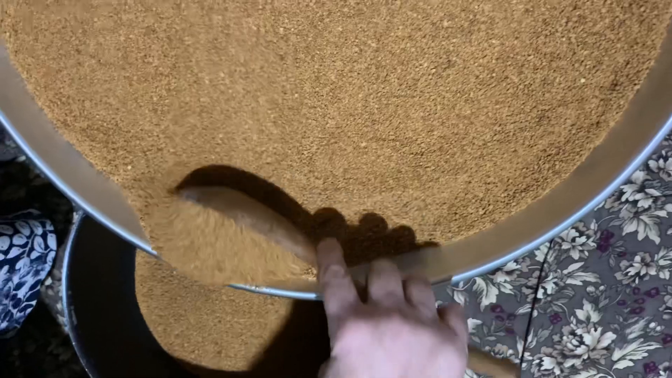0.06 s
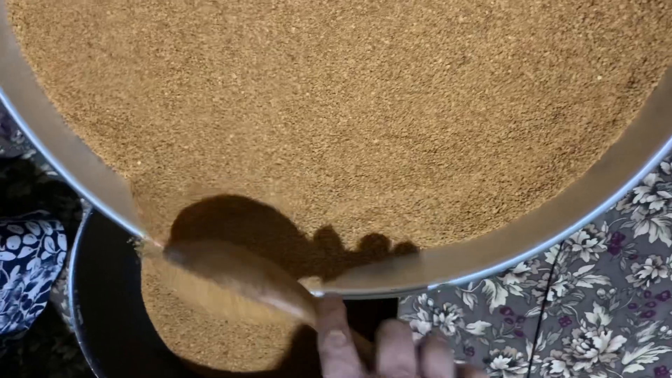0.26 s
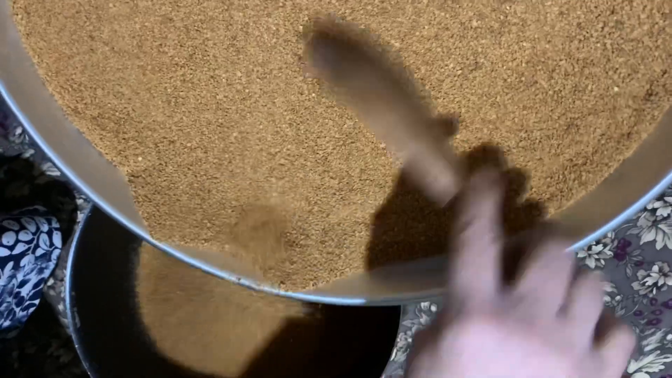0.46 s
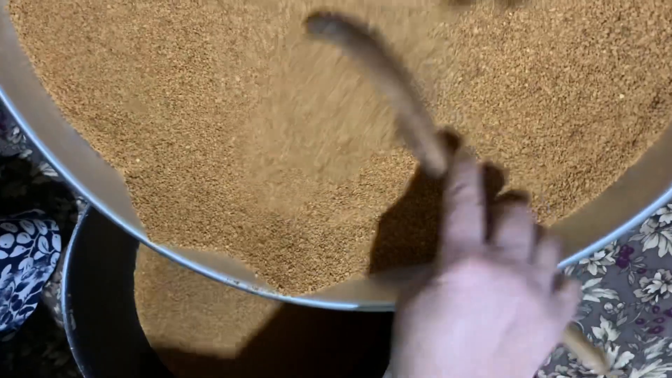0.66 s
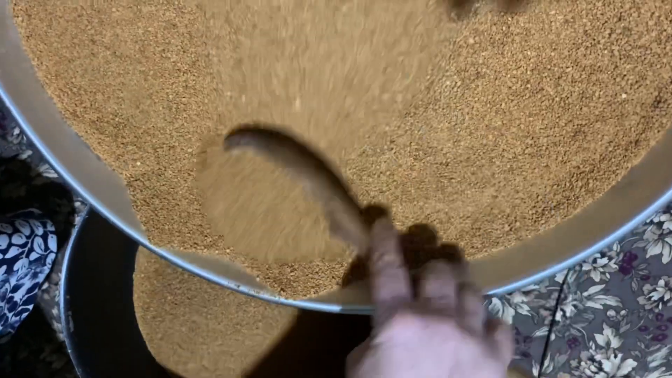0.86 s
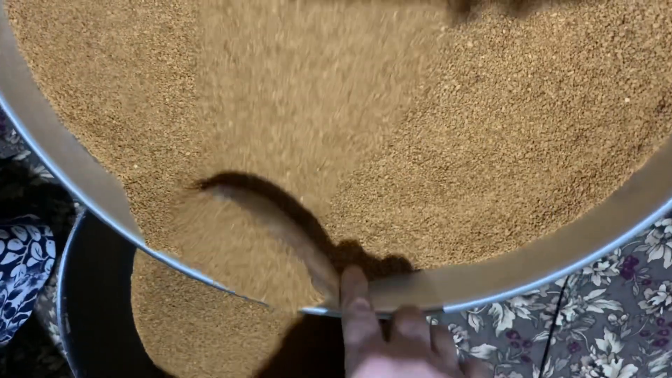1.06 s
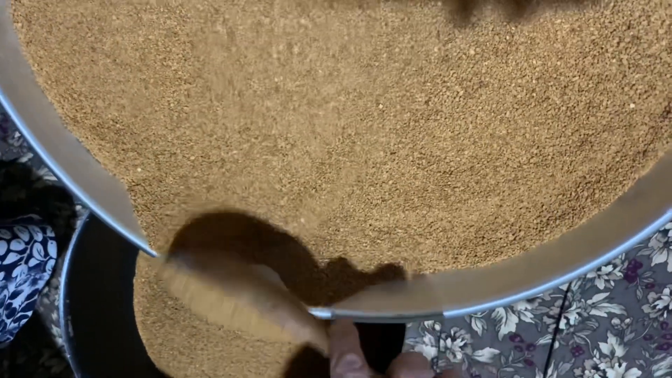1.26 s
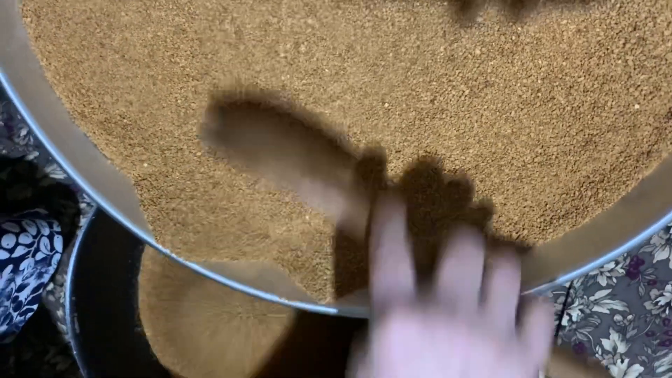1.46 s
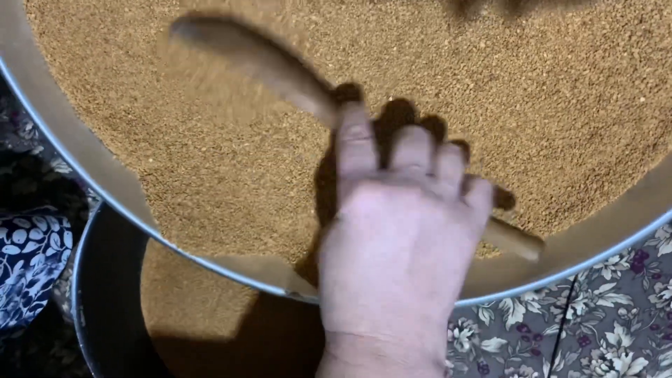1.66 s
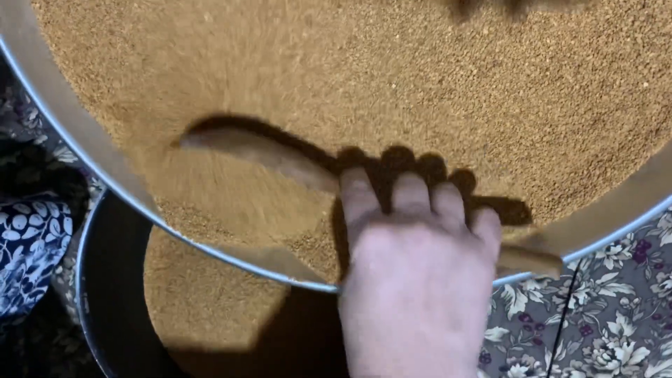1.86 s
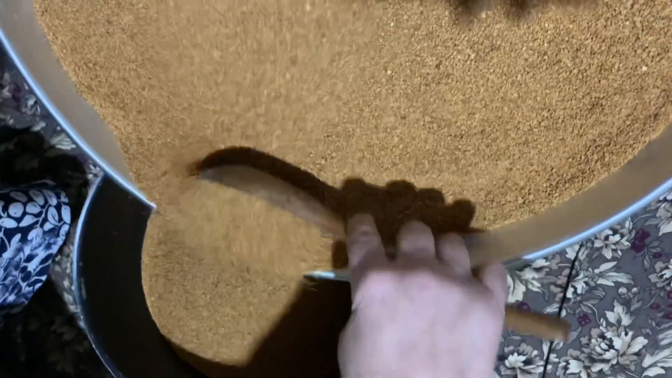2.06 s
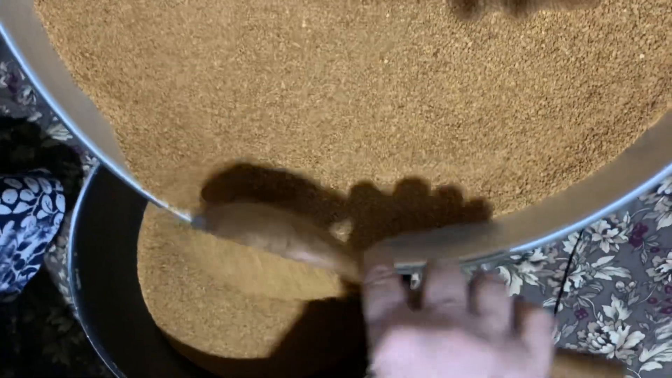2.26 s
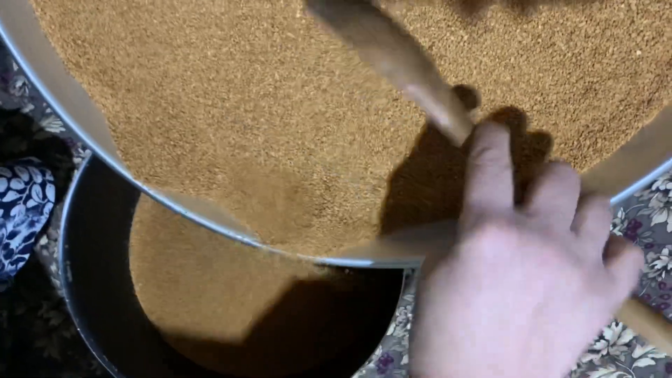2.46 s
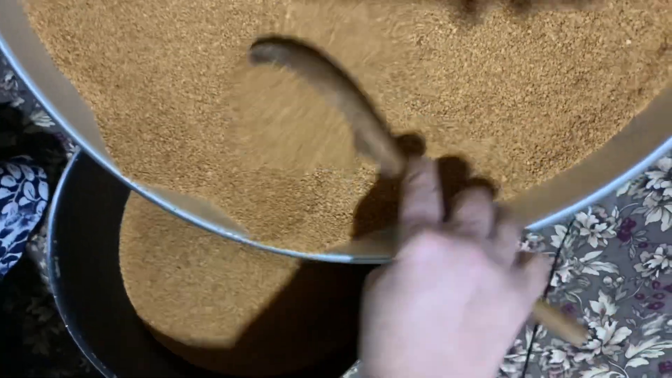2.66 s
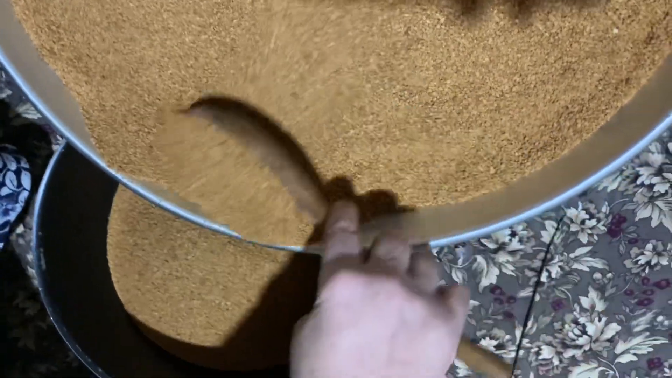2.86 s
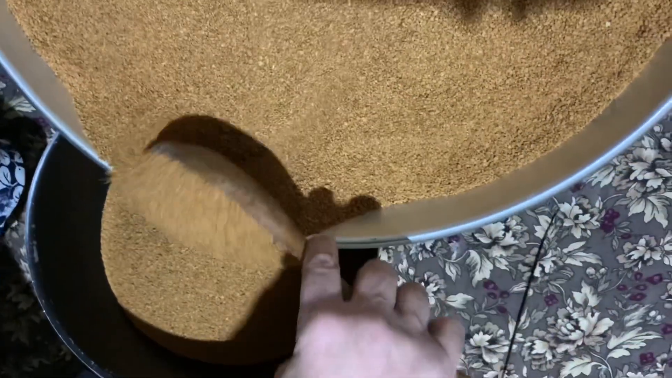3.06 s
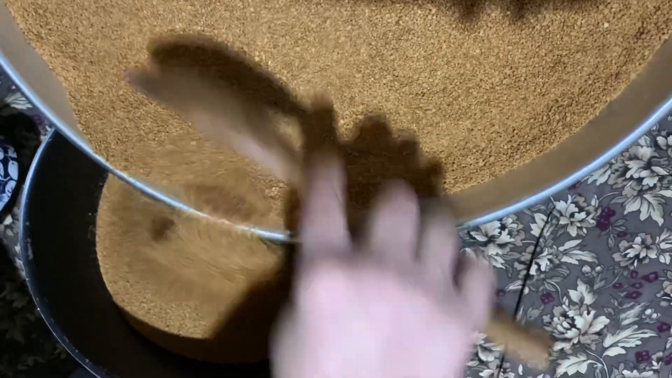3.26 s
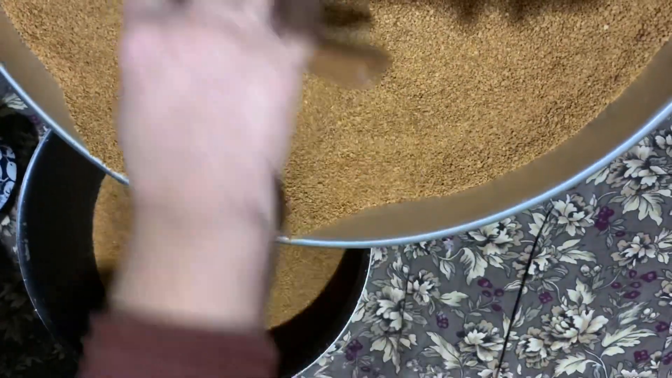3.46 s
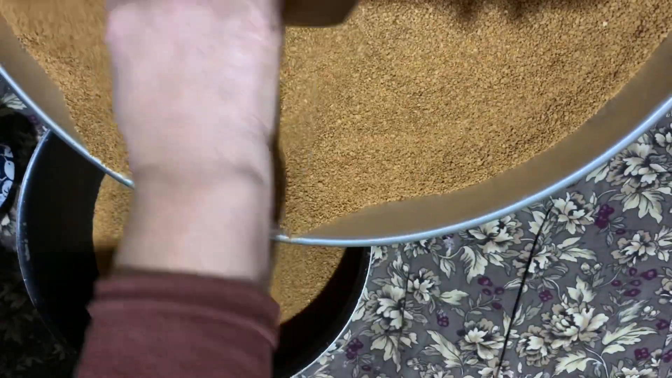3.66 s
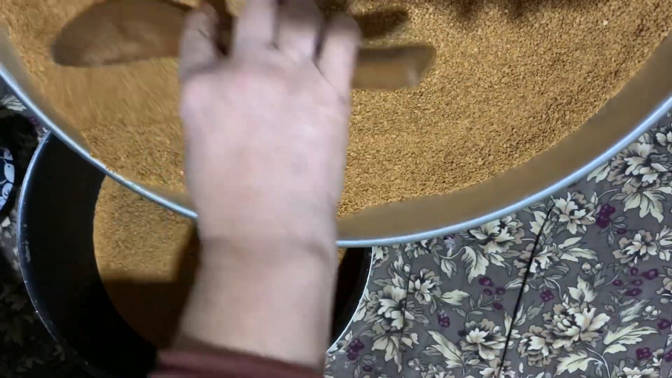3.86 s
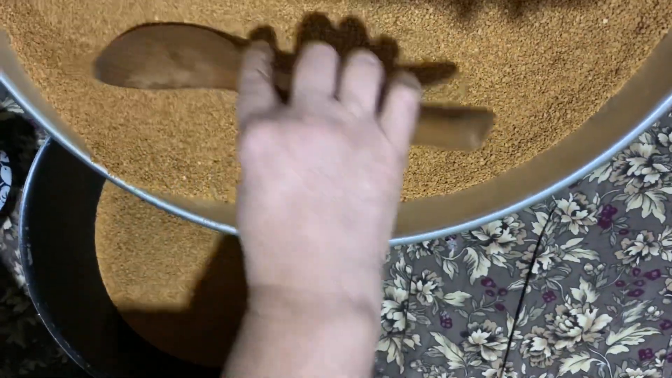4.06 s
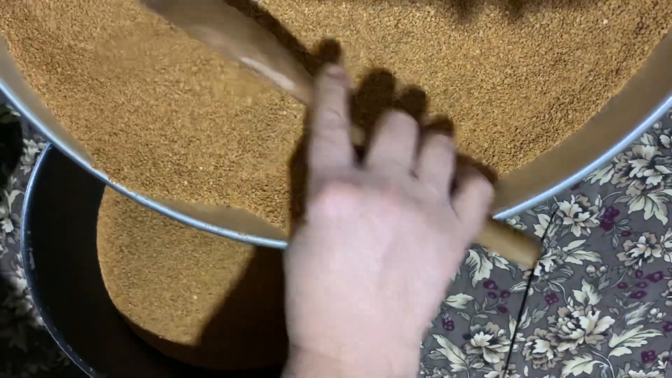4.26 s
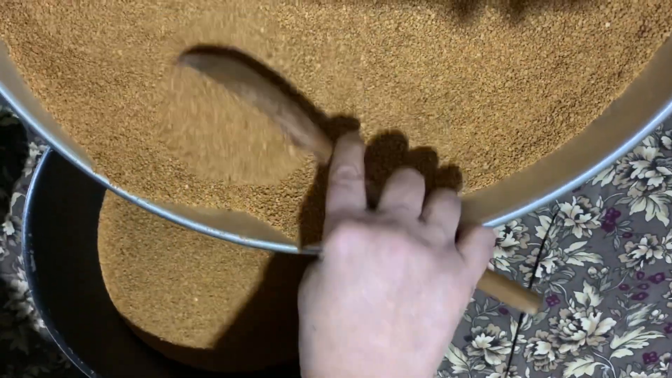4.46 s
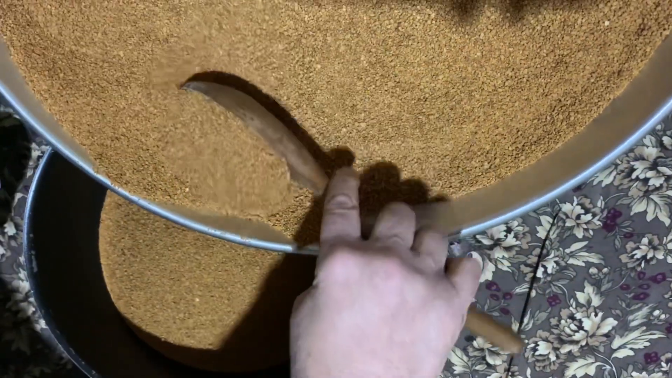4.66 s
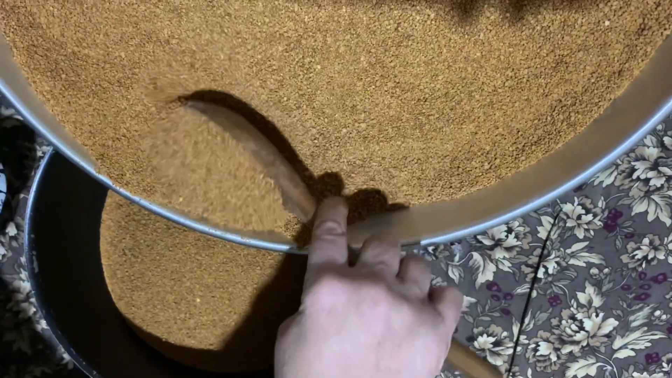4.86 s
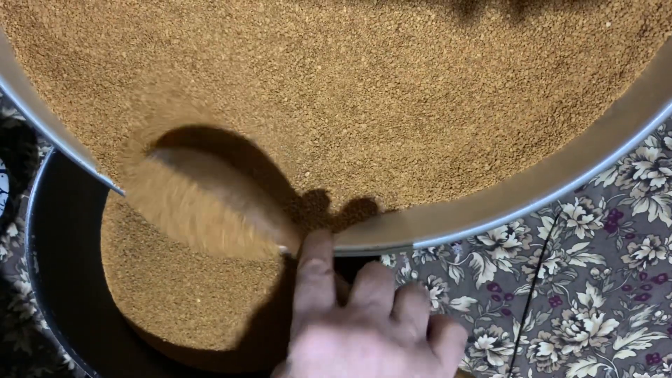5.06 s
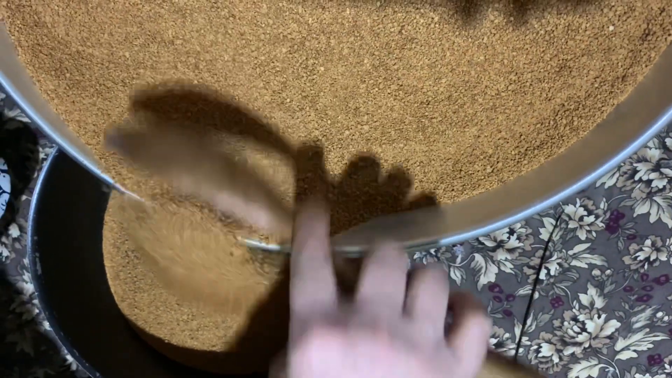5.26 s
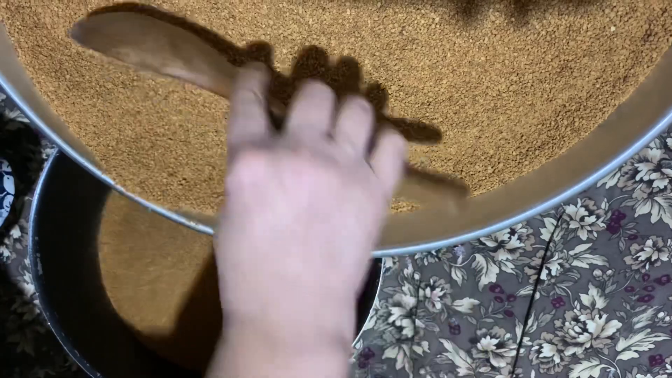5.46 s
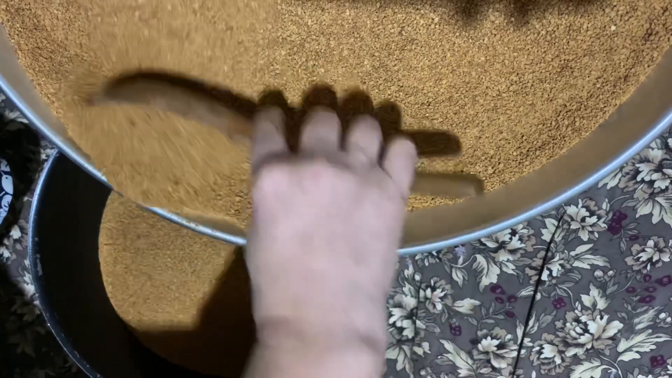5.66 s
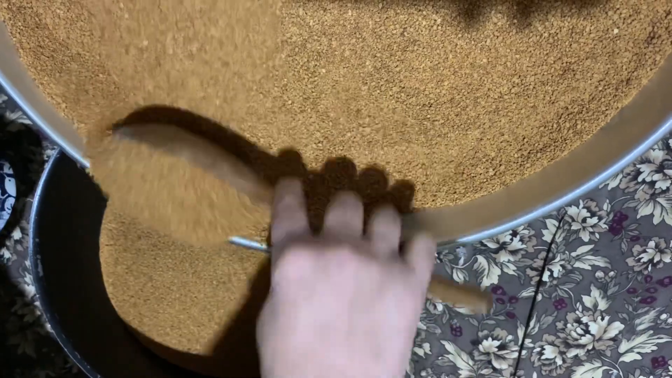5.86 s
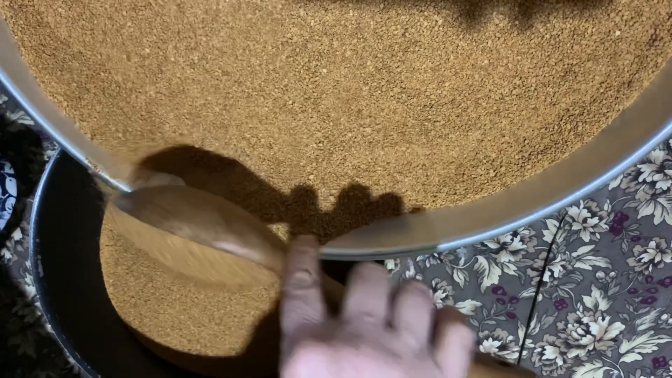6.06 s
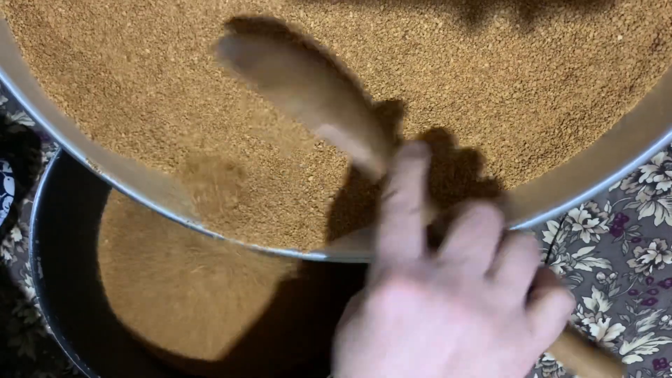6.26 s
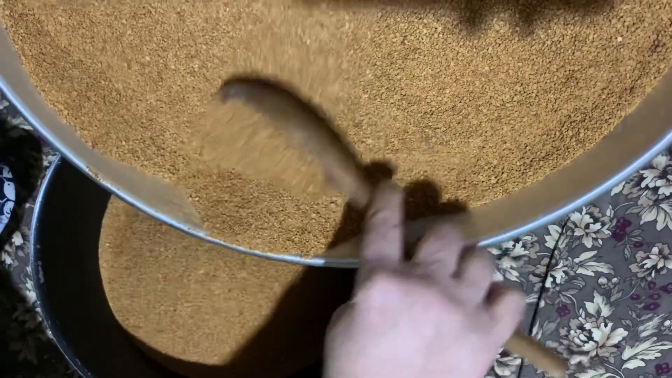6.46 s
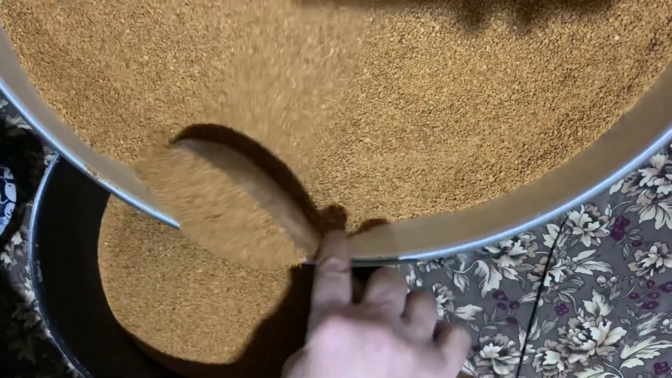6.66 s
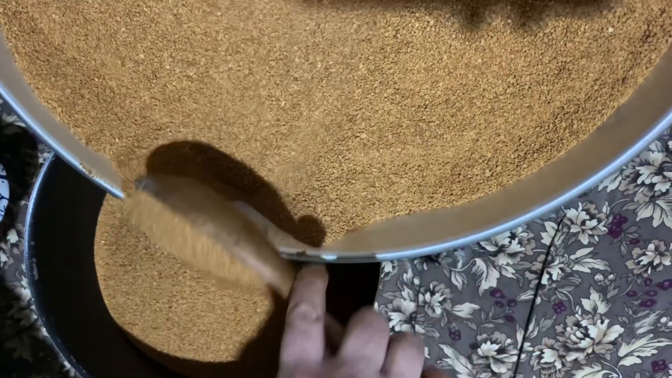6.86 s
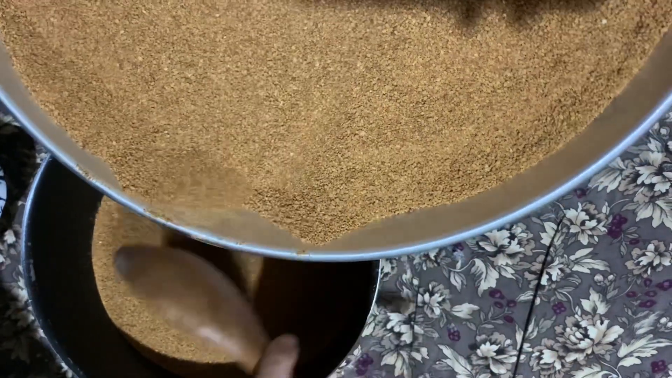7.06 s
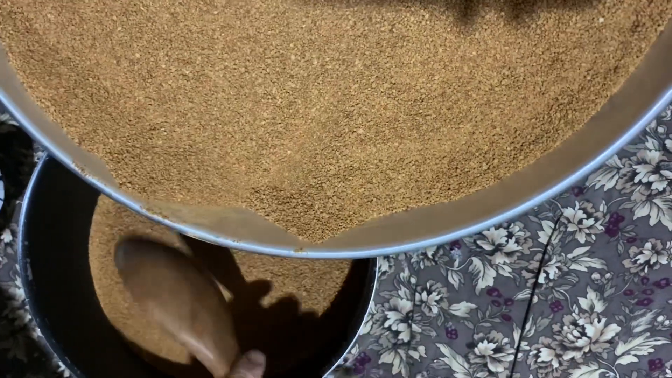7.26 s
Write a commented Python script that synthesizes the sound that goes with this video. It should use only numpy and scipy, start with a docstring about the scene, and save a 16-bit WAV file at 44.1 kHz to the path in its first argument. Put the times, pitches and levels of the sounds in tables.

```python
"""Scooping flour in a kitchen

Close to a stereo pair of microphones, a wooden spoon scoops coarse dry flour across a wide metal tray
and tips it into a pot. Each stroke is a hiss of sliding grains; the spoon crunches through the heap
and knocks the tray, which the flour damps. Farther off a motor, probably traffic outside, hums faintly
and speeds up."""
import sys
import numpy as np
from scipy import signal
from scipy.fft import rfft, irfft, next_fast_len
from scipy.io import wavfile
from scipy.ndimage import uniform_filter1d, map_coordinates

SR = 44100
rng = np.random.default_rng(int(sys.argv[2]) if len(sys.argv) > 2 else 0)


def log_audio(samples):
    """Write samples as a 16-bit WAV file to the path given in sys.argv[1]."""
    # one column per channel
    frames = np.atleast_2d(samples).T
    # limit to full scale, then quantise
    limited = np.clip(frames, -1, 1)
    pcm = np.round(limited * 32767).astype(np.int16)
    wavfile.write(sys.argv[1], SR, pcm)


N = 322812


def amp(db):
    """Decibels to gain."""
    return 10 ** (np.asarray(db) / 20)


def unit(x):
    """Scaled to rms 1."""
    return x / np.sqrt(np.mean(x ** 2) + 1e-20)


def along(points, hz):
    """Rows of (freq_hz, value) read on a log frequency axis."""
    freqs, values = np.transpose(points)
    return np.interp(np.log(hz + 1), np.log(freqs + 1), values)


def curves(rows):
    """One value per sample for each column after the time."""
    times, *columns = np.transpose(rows)
    return [np.interp(np.arange(N) / SR, times, column) for column in columns]


def wobble(rate):
    """A smooth random curve, rate knots a second."""
    return map_coordinates(rng.standard_normal(int(N * rate / SR) + 4), [np.arange(N) * rate / SR])


def hump(hz, centre_hz, octaves):
    """A broad resonance, 1 at its centre."""
    return np.exp(-.5 * (np.log2((hz + 1) / centre_hz) / octaves) ** 2)


def filtered(x, response):
    """x times a complex response of frequency."""
    n = x.shape[-1]
    padded = next_fast_len(n + SR // 10, True)
    return irfft(rfft(x, padded) * response(np.fft.rfftfreq(padded, 1 / SR)), padded)[..., :n]


def coloured(x, spectrum, size=2048):
    """x through a causal filter with this spectrum."""
    cepstrum = irfft(np.log(amp(along(spectrum, np.fft.rfftfreq(size, 1 / SR)))))
    cepstrum[1:size // 2] *= 2
    cepstrum[size // 2 + 1:] = 0
    impulse = irfft(np.exp(rfft(cepstrum)))
    return signal.fftconvolve(x, impulse[None], axes=1)[:, :x.shape[-1]]


# Room tone, all around the microphones: freq_hz, relative_db
AIR_SPECTRUM = [(20, -19.5), (40, -8.5), (55, -3), (100, -3), (200, -16), (400, -15), (1000, -36.5),
                (2200, -32), (4500, -41.5), (15000, -50)]


def room_tone():
    """The quiet air of the kitchen: steady noise, mostly bass."""
    return unit(filtered(rng.standard_normal((2, N)), lambda hz: amp(along(AIR_SPECTRUM, hz))))


# The motor, distant and beyond the walls: time_s, pitch_hz, level_db
MOTOR_PATH = [(0, 59.4, -58), (3.4, 53.9, -89), (3.66, 57.8, -43), (3.78, 65.6, -48), (4.0, 68, -51.5),
              (4.3, 57.8, -46), (4.72, 48.9, -64), (4.92, 55.3, -53), (5.12, 57.1, -45.5),
              (5.24, 59.4, -56), (5.38, 64.7, -41.5), (5.62, 68.6, -55.5), (5.88, 78.4, -48.5),
              (6.1, 83, -67), (6.6, 91.1, -62.5), (6.78, 98.4, -46.5), (7.0, 108.7, -57),
              (7.32, 108.3, -56.5)]


def motor(wall_hz=150, rumble_db=-59.5):
    """Through the walls come only the uneven firing tone, a trace of its octave and a road rumble."""
    hz, db = curves(MOTOR_PATH)
    phase = 2 * np.pi * np.cumsum(hz * (1 + 0.025 * wobble(40))) / SR
    waver_db = 2.3 * wobble(32)
    octave = amp(-10) / (1 + (2 * hz / wall_hz) ** 8) * np.sin(2 * phase)
    tone = unit(amp(waver_db) * (np.sin(phase) + octave))
    rumble = unit(filtered(rng.standard_normal(N), lambda f: hump(f, centre_hz=75, octaves=0.5)))
    return amp(db) * tone + amp(rumble_db + db - db.max()) * rumble


# Decay of the kitchen around the tray: freq_hz, t60_s
WALL_DECAY = [(150, 0.038), (1000, 0.072), (4000, 0.098), (14000, 0.021)]


def kitchen_walls(x, size=4096):
    """The walls answer with a short diffuse tail that keeps changing as arm and spoon move."""
    starts = np.arange(0, N + size // 2, size // 2)
    hz, t, noise = signal.stft(rng.standard_normal((len(starts), 2, size)), SR, nperseg=256)
    tails = signal.istft(noise * amp(-60 * t / along(WALL_DECAY, hz)[:, None]), SR, nperseg=256)[1]
    source = np.pad(x[0], (size // 2, 2 * size))
    out = np.zeros((2, N + 4 * size))
    for start, tail in zip(starts, tails):
        piece = source[start:start + size] * np.sqrt(np.hanning(size))
        echo = signal.fftconvolve(piece[None], tail / np.linalg.norm(tail[0]), axes=1)
        out[:, start + SR // 200:][:, :echo.shape[1]] += echo  # 5 ms after the direct sound
    return out[:, size // 2:][:, :N]


# How alike the two microphones hear the kitchen: freq_hz, coherence
MIC_COHERENCE = [(200, .975), (500, .95), (900, .75), (1500, .5), (2800, .8), (4000, .25), (5400, .5),
                 (6600, .65), (7900, .985), (8900, .985), (9800, .8), (12200, .8), (13000, .98),
                 (14000, .98), (15000, .8)]
# Phase between the microphones: freq_hz, left_lead_rad
MIC_PHASE = [(50, 0), (550, .25), (1000, 1.1), (2000, 2), (2850, 3.1), (3900, .6), (5300, 3), (6200, .2),
             (7900, -3.05), (8900, -3.25), (10500, -6.2), (11600, -6.35), (12900, -9.3), (14000, -9.55),
             (15300, -12.5)]
# Balance between the microphones: freq_hz, left_minus_right_db
MIC_BALANCE = [(100, 2), (350, 2.3), (650, 1.5), (1050, 5.5), (2400, 0.5), (3600, 2), (5200, -3), (6300, 0)]


def microphones(pair):
    """Row 0 is common to both microphones, row 1 is their difference; they become left and right."""
    def blend(hz):
        angle = np.arccos(np.clip(along(MIC_COHERENCE, hz), 0, 1)) / 2
        return np.array([np.cos(angle), np.sin(angle)])

    def placing(hz):
        gains = amp(np.outer([1, -1], along(MIC_BALANCE, hz)) / 2)
        phases = np.outer([1, -1], along(MIC_PHASE, hz)) / 2
        return gains / np.sqrt(np.mean(gains ** 2, 0)) * np.exp(1j * phases)

    common, apart = filtered(pair, blend)
    return filtered(np.array([common + apart, common - apart]), placing)


# Modes of the flour-laden tray, close to the microphones: pitch_hz, relative_db, t60_s
TRAY_MODES = [(262, 6, 0.18), (345.5, 8, 0.17), (431.3, 1, 0.07), (524, 1, 0.09), (612, -7, 0.09),
              (806, -7, 0.1)]
# Modes of the wooden spoon and the rim that it scrapes: pitch_hz, relative_db, t60_s
SPOON_MODES = [(793, 4, 0.055), (900, 4, 0.07), (1194, 7, 0.03), (1305, 2, 0.037), (1599, 0, 0.06),
               (1770, -9, 0.06), (1900, 1, 0.06), (2205, 3, 0.06), (2375, 1, 0.055), (3290, -7.5, 0.04)]


def ringing(modes, t, detune=0.004):
    """A body's answer to one tap, energy 1; each spot and load of flour rings it a little differently."""
    ring = 0
    for hz, db, t60 in modes:
        decay = amp(db + rng.normal(0, 1.1) - 60 * t / t60)
        ring += decay * np.sin(2 * np.pi * hz * (1 + rng.normal(0, detune)) * t)
    return ring / np.linalg.norm(ring)


def touching(x, modes, ring_db):
    """Grain impacts together with the ring that they raise in a body, rms 1."""
    tap = ringing(modes, np.arange(SR // 4) / SR)
    ring = signal.fftconvolve(x, tap[None], axes=1)[:, :x.shape[-1]]
    return unit(unit(x) + amp(ring_db) * unit(ring))


def grains(length, rate, spread_db):
    """Two unrelated streams of tiny impacts of random size, rate a second, rms 1."""
    hits = rng.random((2, length)) < rate / SR
    return unit(hits * rng.standard_normal((2, length)) * amp(spread_db * rng.standard_normal((2, length))))


def gesture(t, length, rise_s, ease_db_per_s, stop_db_per_s):
    """Gain of a movement that begins at t = 0: it rises, eases and dies away after its length."""
    t = np.maximum(t, 0)
    fall_db = ease_db_per_s * t + stop_db_per_s * np.maximum(t - length, 0)
    return (1 - np.exp(-t / rise_s)) * amp(-fall_db)


def swell(t, middle, length):
    """A smooth rise and fall, 1 at its middle."""
    return np.cos(np.pi * np.clip((t - middle) / length, -.5, .5)) ** 2


# The spoon pushes through the heap, close up: start_s, length_s, rub_db, hiss_db, ease_db_per_s, spray_db
SPOON_STROKES = [(0.0, 0.11, -48.5, -42, 25, -46), (0.42, 0.72, -42.5, -34, 16, -27.5),
                 (1.415, 0.61, -47, -35, 9.5, -30), (2.345, 0.64, -48, -42.5, 12, -30),
                 (3.325, 0.65, -47, -41.5, 11.5, -59), (4.15, 0.13, -48.5, -39.5, 12, -67),
                 (4.342, 0.3, -53.5, -50, 11.5, -72), (5.305, 0.59, -48, -38.5, 8.5, -35),
                 (6.189, 0.55, -43, -36, 31, -28)]
# It bears down or turns in the heap: middle_s, length_s, rub_db, rasp_db, hiss_db, band_hz
SPOON_DRAGS = [(0.614, 0.23, -61, -53, -43, 2200), (0.973, 0.29, -53, -46.5, -37.5, 4100),
               (1.756, 0.25, -50, -47, -38.5, 4170), (2.002, 0.34, -47.5, -44.5, -38.5, 3580),
               (2.464, 0.11, -61, -52, -38.5, 2170), (2.638, 0.29, -50.5, -56, -43.5, 980),
               (2.802, 0.35, -65, -46, -41, 4280), (3.673, 0.55, -70, -65, -41.5, 890),
               (4.035, 0.16, -80, -61, -41, 5000), (4.293, 0.18, -36.5, -48.5, -38, 905),
               (4.572, 0.13, -68, -55.5, -49, 1980), (4.897, 0.51, -60, -55.5, -47.5, 3443),
               (5.412, 0.13, -32, -41.5, -36, 970), (5.562, 0.22, -50, -49.5, -37, 3800),
               (5.785, 0.34, -62, -43.5, -44.5, 4040), (6.4, 0.26, -59, -60, -43, 1030),
               (6.536, 0.45, -68, -46.5, -39.5, 3970), (6.738, 0.2, -47, -53, -51, 770),
               (6.916, 0.12, -85, -78, -46, 5200)]
# Flour slides off it into the nearby pot: start_s, length_s, hiss_db
POT_POURS = [(0.182, 0.27, -45), (1.2, 0.25, -48), (2.112, 0.34, -43), (3.02, 0.24, -46.5),
             (4.668, 0.36, -44), (5, 0.29, -44.5), (5.894, 0.26, -47.5), (6.774, 0.33, -47.5)]


def flour_flow(plunge_s=0.0024, sink_s=0.0081, spray_s=0.0076, settle_db_per_s=126):
    """Strokes, drags and pours add up in power; rows of time_s, rub_db, rasp_db, hiss_db."""
    t = np.arange(0, N / SR, .001)
    parts = []
    for start, length, rub_db, hiss_db, ease, spray_db in SPOON_STROKES:
        # The surface sprays and hisses at once; rub and rasp build as the spoon sinks in.
        rub = amp(rub_db) * gesture(t - start, length, sink_s, ease, settle_db_per_s)
        surface = amp(hiss_db) + amp(spray_db) * np.exp(-abs(t - start) / spray_s)
        hiss = surface * gesture(t - start, length, plunge_s, ease, settle_db_per_s)
        parts.append([rub, rub * amp(-2), hiss])
    for middle, length, rub_db, rasp_db, hiss_db, _ in SPOON_DRAGS:
        parts.append(np.outer(amp([rub_db, rasp_db, hiss_db]), swell(t, middle, length)))
    for start, length, hiss_db in POT_POURS:
        stream = gesture(t - start, length, rise_s=0.033, ease_db_per_s=47.5, stop_db_per_s=140)
        hiss = amp(hiss_db) * stream
        parts.append([hiss * amp(-14.5), hiss * amp(-13.5), hiss])  # falling flour barely drums or rasps
    power = np.sum(np.square(parts), 0)
    return np.column_stack([t, *10 * np.log10(power + 1e-12)])


def grinding(hz, t, peak_db=3.5):
    """Boost in dB of the band in which each drag grinds: low when deep, high when shallow."""
    return peak_db * sum(np.sqrt(swell(t, middle, length)) * hump(hz, band_hz, octaves=0.2)
                         for middle, length, *_, band_hz in SPOON_DRAGS)


def brightening(hz, t, peak_db=0.5, start_hz=10500, climb_oct_per_s=0.62):
    """Boost in dB of a peak that climbs through the hiss as the grains of each stroke gather speed."""
    starts = np.array([row[0] for row in SPOON_STROKES])
    age = t - starts[np.maximum(np.searchsorted(starts, t) - 1, 0)]
    return peak_db * hump(hz, start_hz * 2 ** (climb_oct_per_s * age), octaves=0.39)


def shifting(x, boost, depth_db, bins):
    """The colour follows the spoon's work, and drifts in patches as the hand moves over the tray."""
    hz, t, spectra = signal.stft(unit(x), SR, nperseg=1024)
    patches = uniform_filter1d(rng.standard_normal(spectra.shape[1:]), size=bins, axis=0)
    patches = uniform_filter1d(patches, size=14, axis=1, mode="wrap")
    drift = unit(amp(depth_db * unit(patches)))
    return signal.istft(spectra * drift * amp(boost(hz[:, None], t)), nperseg=1024)[1][:, :N]


# Moving flour at close range, as low rub, middle rasp and high hiss: freq_hz, relative_db
RUB_SPECTRUM = [(40, -37.5), (90, -7), (150, -5), (330, 1), (480, 2.5), (750, -2.5), (1050, -3.5),
                (1500, -20), (3000, -49.5)]
RASP_SPECTRUM = [(500, -31.5), (900, -4), (1300, 2.5), (1700, 1.5), (2250, 5), (2850, 3.5), (3400, 0),
                 (4200, 0), (5700, -0.5), (6500, -16.5), (8000, -62)]
HISS_SPECTRUM = [(3500, -37.5), (5600, -10.5), (6300, -7), (7200, -2), (9400, -1), (11200, 1.5),
                 (14000, -0.5), (15600, -0.5)]


def sliding_flour():
    """Grains hiss as they slide, rasp where the spoon shears them and drum softly on the tray."""
    rub_db, rasp_db, hiss_db = curves(flour_flow())
    clumps = wobble(55)  # the heap gives way in small lumps
    slips_db = 1.6 * wobble(45)  # the spoon catches and slips on the tray
    rub = coloured(grains(N, rate=900, spread_db=1), RUB_SPECTRUM)
    rub = touching(rub, TRAY_MODES, ring_db=-7)
    fine = grains(N, rate=4000, spread_db=1.5)
    coarse = amp(-3) * grains(N, rate=310, spread_db=0)  # a few big grains tick on the wood
    rasp = touching(coloured(fine + coarse, RASP_SPECTRUM), SPOON_MODES, ring_db=-21)
    hiss = coloured(grains(N, rate=24000, spread_db=1), HISS_SPECTRUM)
    rub = shifting(rub, grinding, depth_db=2.1, bins=5) * amp(rub_db + slips_db)
    rasp = shifting(rasp, grinding, depth_db=2.1, bins=12) * amp(rasp_db + 1.7 * clumps)
    hiss = shifting(hiss, brightening, depth_db=2.2, bins=18)
    hiss *= amp(hiss_db + 0.73 * clumps + 0.77 * wobble(140))
    return rub + rasp + hiss


def burst(x, db):
    """x with the energy of 10 ms at this rms level."""
    energy = np.mean(np.sum(np.atleast_2d(x) ** 2, 1))
    return x * amp(db) * np.sqrt(SR / 100 / energy)


def struck_tray(t, rise_s, press, hz, db, thud_t60=0.03, rock_t60=0.054):
    """The damped tray thuds, bends at a higher pitch during the contact, rings weakly and rocks."""
    push = (1 - np.exp(-t / rise_s / 2)) ** 2  # the heap cushions the blow
    cycles = hz * t + 0.25 * (1 - np.exp(-t / 0.0017))  # fast bending waves arrive first: the pitch drops
    thud = burst(push * amp(-60 * t / thud_t60) * np.sin(2 * np.pi * cycles), db - 2)
    bend = burst(press * np.sin(2 * np.pi * 2.067 * hz * t), db - 15)
    ring = burst(push * ringing(TRAY_MODES, t), db - 10)
    rock = burst(push * amp(-60 * t / rock_t60) * np.sin(2 * np.pi * 0.521 * hz * t), db - 14.5)
    return thud + bend + ring + rock


# Flour crushed under the spoon, close up: freq_hz, relative_db
CRUNCH_SPECTRUM = [(200, -17.5), (450, -22), (800, -4.5), (1200, -4.5), (2000, 3), (2900, -0.5),
                   (4200, -5.5), (5800, -7.5), (8000, -27.5)]
# Strikes on the tray, close to the microphones; each layer is set relative to these levels:
# start_s, rise_s, thud_db, crunch_db, grit_db, pitch_hz
SPOON_STRIKES = [(0.047, 0.00043, -31.5, -42, -53, 637), (0.065, 0.0014, -36, -37.5, -37.5, 320),
                 (0.124, 0.00092, -37, -51, -52, 377), (0.456, 0.0015, -23.5, -30.5, -26, 410),
                 (0.4632, 0.001, -23.5, -29, -27, 536), (0.479, 0.0011, -18.5, -31, -24, 308),
                 (0.4894, 0.00079, -19, -26.5, -17.5, 216), (0.525, 0.0016, -30, -32, -31, 400),
                 (0.534, 0.00063, -20, -52, -38, 260), (0.551, 0.0012, -46, -33.5, -32, 348),
                 (0.566, 0.0015, -35, -35, -33, 340), (0.597, 0.0007, -43, -42, -35, 338),
                 (0.63, 0.0009, -43, -44, -44, 315), (0.656, 0.00091, -43, -41.5, -48, 786),
                 (0.697, 0.0024, -30.5, -41.5, -52, 330), (1.103, 0.0016, -38.5, -44, -41, 297),
                 (1.332, 0.0012, -40.5, -84, -72, 448), (1.488, 0.0029, -20.5, -31, -25.5, 254),
                 (1.516, 0.0025, -18.5, -27, -18, 357), (1.521, 0.00073, -15.5, -28, -26, 262),
                 (1.559, 0.0021, -15.5, -22.5, -17.5, 361), (1.571, 0.0025, -31, -36, -29, 252),
                 (1.585, 0.001, -28, -35, -28, 287), (1.642, 0.00038, -38.5, -46, -35, 524),
                 (2.37, 0.0081, -44, -41, -31.5, 380), (2.388, 0.0026, -26, -31.5, -34, 300),
                 (2.4, 0.0012, -18.5, -28, -26.5, 373), (2.407, 0.0017, -16.5, -26, -19.5, 370),
                 (2.413, 0.0014, -19.5, -52, -39, 256), (2.569, 0.00081, -42, -55, -50, 400),
                 (2.775, 0.0016, -37, -32, -31.5, 383), (2.789, 0.006, -39, -38, -37, 272),
                 (2.808, 0.0014, -40, -47, -41, 205), (2.972, 0.0013, -33, -36.5, -36.5, 366),
                 (3.464, 0.0029, -28, -37, -41, 284), (3.636, 0.00097, -32.5, -51, -54, 383),
                 (3.658, 0.001, -42.5, -51, -56, 440), (4.282, 0.0025, -30, -36.5, -34, 837),
                 (4.289, 0.0022, -27.5, -32.5, -32, 346), (5.398, 0.0014, -28.5, -35, -27.5, 464),
                 (5.416, 0.0011, -28, -47, -52, 395), (5.428, 0.0012, -27.5, -37, -30, 466),
                 (5.437, 0.009, -31, -43, -38, 136), (5.465, 0.0015, -35.5, -41, -35, 900),
                 (5.584, 0.0012, -44, -39.5, -36, 430), (5.703, 0.0015, -36.5, -45, -39, 482),
                 (5.734, 0.0013, -54, -49, -38, 348), (6.212, 0.008, -33, -34, -26.5, 707),
                 (6.227, 0.0039, -25, -31.5, -26, 343), (6.266, 0.0015, -41, -40, -32, 353),
                 (6.497, 0.0017, -36.5, -36.5, -27.5, 287.5), (6.506, 0.0008, -47, -54, -34, 300),
                 (6.514, 0.0012, -38.5, -43, -27.5, 255), (6.566, 0.00095, -50, -63, -34.5, 270),
                 (6.649, 0.0038, -36.5, -44.5, -40, 253), (7.207, 0.0085, -72, -61, -44, 456)]


def spoon_strikes(spill_t60=0.08, clack_t60=0.089):
    """Each strike crushes grains, knocks the tray and rings the wood, which the hand damps."""
    out = np.zeros((2, N + SR))
    t = np.arange(SR // 4) / SR
    for start, rise_s, thud_db, crunch_db, grit_db, hz in SPOON_STRIKES:
        onset = 1 - np.exp(-t / rise_s)
        press = t / rise_s * np.exp(1 - t / rise_s)
        crush = press + onset * amp(-22 - 60 * t / spill_t60)  # thrown grains settle after the blow
        crunch = coloured(crush * grains(len(t), rate=3000, spread_db=1.5), CRUNCH_SPECTRUM)
        crunch = burst(touching(crunch, SPOON_MODES, ring_db=-11), crunch_db - 1)
        clack = burst(onset * amp(-60 * t / clack_t60) * ringing(SPOON_MODES, t), crunch_db - 7.5)
        grit = coloured(crush * grains(len(t), rate=14000, spread_db=6), HISS_SPECTRUM)
        tray = struck_tray(t, rise_s, press, hz, thud_db)
        judder = coloured(crush * grains(len(t), rate=3000, spread_db=2), RUB_SPECTRUM)
        hit = crunch + burst(grit, grit_db) + burst(judder, thud_db - 12.5)
        hit[0] += tray + clack  # the whole tray moves, so this is common to both microphones
        out[:, round(start * SR):][:, :len(t)] += hit
    return out[:, :N]


def scene():
    """Spoon and flour close to the microphones, the kitchen around them, the motor far off."""
    near = sliding_flour() + spoon_strikes()
    air = amp(-59.5) * room_tone()
    reflections = amp(-8) * kitchen_walls(near)
    return microphones(near + reflections + air) + motor()


def record(dry):
    """The recorder keeps nothing above its band limit."""
    top_hz = 15850
    return filtered(dry, lambda hz: 1 / (1 + (hz / top_hz) ** 200))


dry = scene()
out = record(dry)
log_audio(out)
```